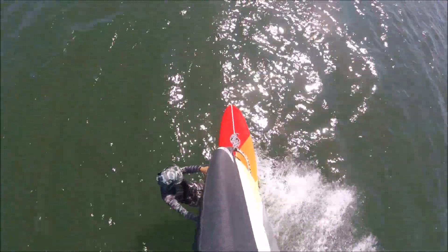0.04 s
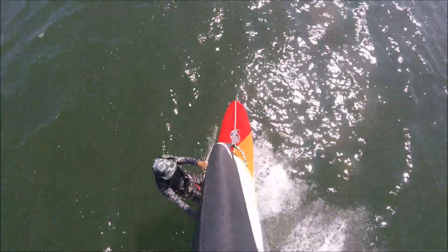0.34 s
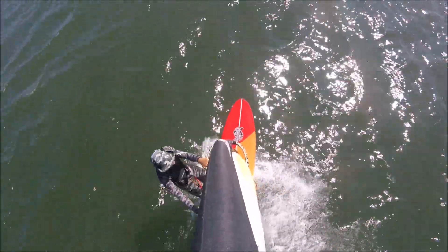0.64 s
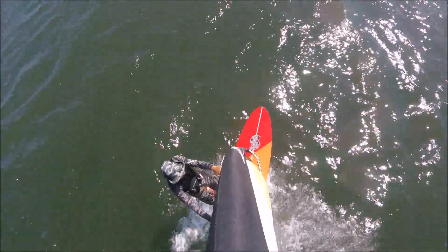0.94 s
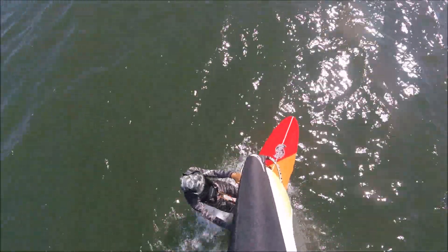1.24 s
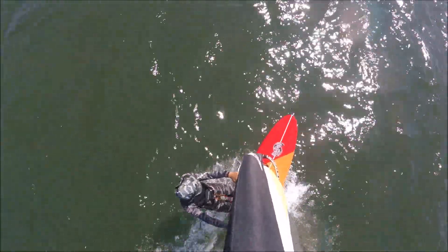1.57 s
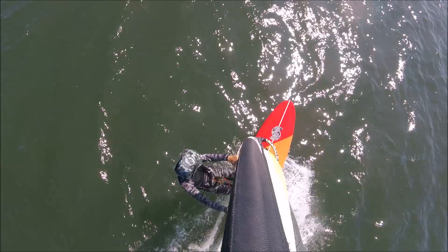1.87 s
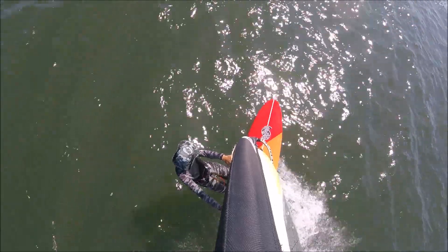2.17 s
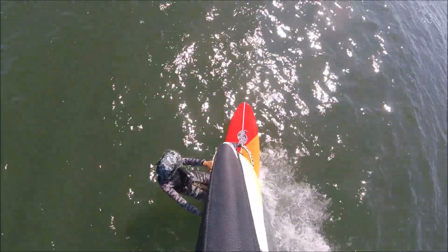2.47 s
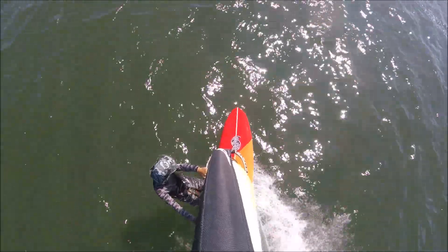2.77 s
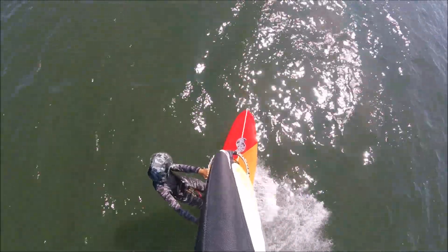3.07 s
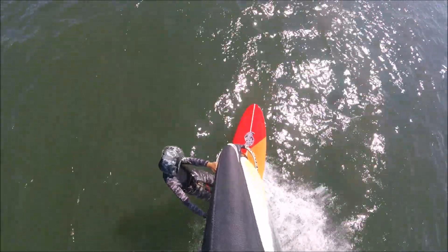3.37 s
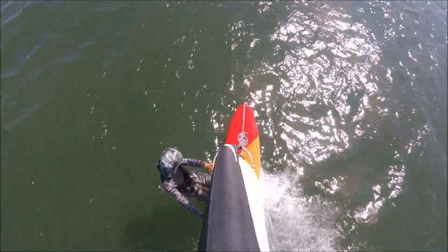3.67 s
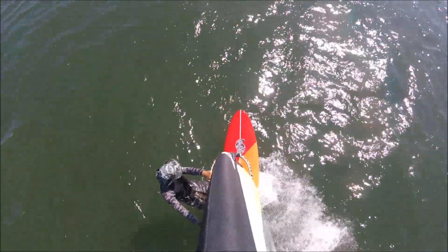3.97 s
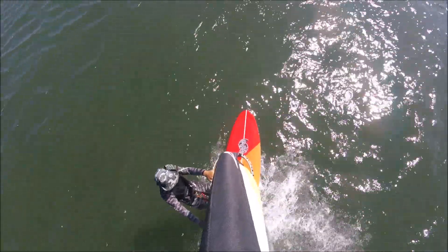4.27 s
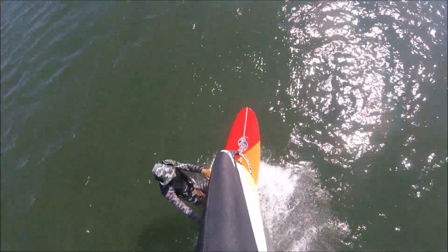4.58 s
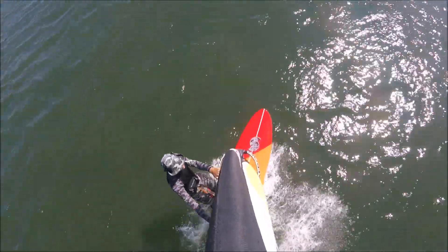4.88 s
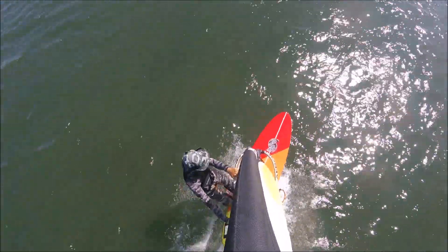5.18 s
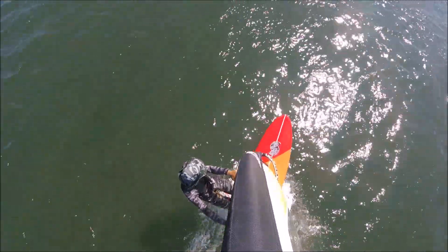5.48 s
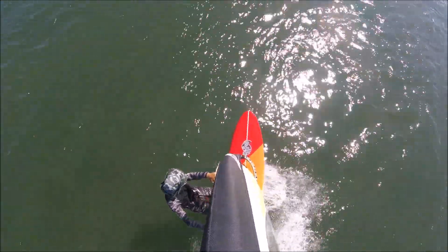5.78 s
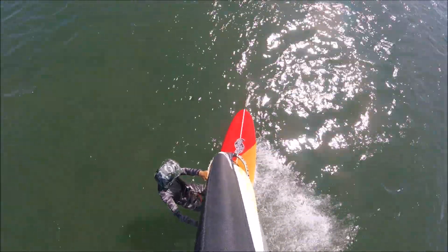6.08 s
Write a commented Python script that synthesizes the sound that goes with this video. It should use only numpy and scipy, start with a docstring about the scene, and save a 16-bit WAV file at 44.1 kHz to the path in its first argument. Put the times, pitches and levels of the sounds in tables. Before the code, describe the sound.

Gusty wind rumbles on the microphone over rushing, gurgling water and the hollow slaps of a fast windsurf board hitting chop.

```python
"""On choppy open water, high on the mast of a planing windsurf board.
Wind buffets the camera's microphone. Below, the hull churns, gushes and slaps the chop, and the sail
throws each slap back. Splashes crackle and ring with trapped air over a hiss of spray. A few drops
tick on the camera; an early one smacks the microphone and ducks the mix. Near the end the rail bites
and a thin sheet of spray sizzles off it."""
import sys
import numpy as np
from scipy import signal
from scipy.fft import rfft, irfft
from scipy.io import wavfile
from scipy.ndimage import uniform_filter1d, minimum_filter1d

SR = 44100
rng = np.random.default_rng(int(sys.argv[2]) if len(sys.argv) > 2 else 0)


def log_audio(samples):
    """Write samples as a 16-bit WAV file to the path given in sys.argv[1]."""
    # one column per channel
    frames = np.atleast_2d(samples).T
    # limit to full scale, then quantise
    limited = np.clip(frames, -1, 1)
    pcm = np.round(limited * 32767).astype(np.int16)
    wavfile.write(sys.argv[1], SR, pcm)


N = 274520
TIME = np.arange(N) / SR


def gain_of(db):
    """Decibels to a gain."""
    return 10 ** (np.asarray(db) / 20)


def unit_rms(x):
    """Scales to rms 1."""
    return x / np.sqrt(np.mean(x ** 2) + 1e-20)


def follow(curve, depth=1):
    """A fader ride along a (time, level) curve; depth scales its decibels."""
    times, db = np.transpose(curve)
    return gain_of(depth * np.interp(TIME, times, db))


def swell(start, hold, rise_s, fall_s):
    """An envelope: linear attack, held until start + hold, exponential release."""
    attack = np.clip((TIME - start) / rise_s, 0, 1)
    return attack * np.exp(-np.maximum(TIME - start - hold, 0) / fall_s)


def equalise(x, curve):
    """Shapes x with an EQ curve, at rms 1."""
    hz, db = np.transpose(curve)
    bins = np.fft.rfftfreq(len(x), 1 / SR)
    response = gain_of(np.interp(np.log(bins + 1), np.log(hz), db))
    return unit_rms(irfft(rfft(x) * response, len(x)))


def add(mix, start, sound):
    """Lays a sound into the mix from a start time in seconds."""
    part = mix[max(round(start * SR), 0):][:len(sound)]
    part += sound[:len(part)]


def drift(rate_hz):
    """A random wobble of rms 1, up to about the given rate."""
    bins = np.fft.rfftfreq(N, 1 / SR)
    return unit_rms(irfft(rfft(rng.standard_normal(N)) / (1 + (bins / rate_hz) ** 4), N))


def jitter(samples, smoothing):
    """A short, quick flutter of rms 1, smoothed over some samples."""
    return unit_rms(uniform_filter1d(rng.standard_normal(samples), size=smoothing))


def patchy_noise(depth_db, width_bins):
    """Noise whose level wanders in small patches of time and frequency."""
    spectra = signal.stft(rng.standard_normal(N), nperseg=256, noverlap=192)[2]
    patches = uniform_filter1d(rng.standard_normal(spectra.shape), size=10, axis=1)
    patches = unit_rms(uniform_filter1d(patches, width_bins, axis=0))
    return signal.istft(spectra * gain_of(depth_db * patches), nperseg=256, noverlap=192)[1][:N]


def froth(envelope, hz, spread):
    """A puff of tiny bubbles: enveloped noise in a band around hz, at rms 1."""
    bins = np.fft.rfftfreq(len(envelope), 1 / SR) + 1
    band = np.exp(-(np.log(bins / hz) / spread) ** 2)
    return unit_rms(irfft(rfft(envelope * rng.standard_normal(len(envelope))) * band))


# Fader ride of the wind on the microphone: (time [s], level [dB])
WIND_RIDE = [(0, -11), (.23, -12), (.3, -13), (1, -12.5), (1.4, -12), (1.72, -13), (1.95, -14), (2.3, -12),
             (2.9, -12.5), (3.95, -10.5), (5.2, -13), (5.65, -9), (6.22, -13)]
# Rumble of the wind: (frequency [Hz], level [dB])
WIND_EQ = [(10, -9), (25, 0.5), (33, -5.5), (42, 2), (52, -2), (65, 1), (85, -4.5), (125, -7.5),
           (170, -14.5), (240, -21), (350, -29.5), (600, -36.5), (1500, -67), (5000, -102)]
# Large slow eddies sitting on the microphone: (start [s], hold [s], level against the wind [dB])
EDDY_CUES = [(0, 0.28, 2.5), (2.725, 0.19, 5)]
# Sub-bass of those eddies: (frequency [Hz], level [dB])
EDDY_EQ = [(15, -14), (28, 3.5), (36, 7), (48, 9.5), (90, -20.5), (2000, -140)]
def wind_buffet():
    """Eddies push on the microphone in quick gusts; the strongest pushes flatten out."""
    eddies = sum(gain_of(db) * swell(start, hold, rise_s=.02, fall_s=.02)
                 for start, hold, db in EDDY_CUES)
    push = equalise(rng.standard_normal(N), WIND_EQ)
    push += eddies * equalise(rng.standard_normal(N), EDDY_EQ)
    power = uniform_filter1d(abs(signal.hilbert(push)) ** 2, size=500) / 2
    gusts = gain_of(np.minimum(drift(rate_hz=12), 1))
    return follow(WIND_RIDE) * gusts * unit_rms(push / np.sqrt(1 + power))


# The rail bites and throws a burst of spray.
RAIL_BITE_S, RAIL_HOLD_S, RAIL_RISE_S = 5.575, .068, .018
# Fader ride of the mist's hiss, swelling and thinning: (time [s], level [dB])
MIST_RIDE = [(0, -43), (.25, -49), (.7, -47.5), (1.05, -45.5), (1.2, -50.5), (1.45, -52), (1.65, -47.5),
             (1.92, -51.5), (2.15, -47), (2.5, -47), (2.78, -43.5), (3.05, -48), (3.42, -43.5), (3.7, -46),
             (4, -43), (4.72, -47), (5.44, -47), (5.51, -48), (5.58, -47.5), (6.22, -45)]
# Hiss of the mist: (frequency [Hz], level [dB])
MIST_EQ = [(1000, -1), (3000, 6), (5000, 0), (6200, -2), (7400, -3.5), (8500, -10.5), (10000, -17),
           (11300, -25), (14400, -24.5), (16000, -43.5)]
def mist():
    """Fine spray hisses smoothly and puffs up as the rail bites."""
    puff = gain_of(-43) * swell(RAIL_BITE_S, RAIL_HOLD_S, RAIL_RISE_S, fall_s=.002)
    hiss = equalise(patchy_noise(depth_db=1.3, width_bins=10), MIST_EQ)
    return np.hypot(follow(MIST_RIDE), puff) * hiss


# Sizzle of the sheet of spray: (frequency [Hz], level [dB])
SHEET_EQ = [(3000, -41), (4300, -21), (5000, -0.5), (5600, -4.5), (6250, -1.5), (6900, -15.5), (8600, -17),
            (10400, -19.5), (11100, -20), (11900, -40), (13200, -29), (15000, -46)]
def spray_sheet(full_db=-43.5, halfway_s=5.72, build_s=.15):
    """A thin sheet of spray builds up off the rail, sizzling higher than the mist."""
    fade_in = gain_of(full_db) / (1 + np.exp((halfway_s - TIME) / build_s))
    return fade_in * equalise(patchy_noise(depth_db=1.5, width_bins=10), SHEET_EQ)


# How hard the hull presses into the water, against steady planing: (time [s], load [dB])
HULL_LOAD = [(0, -4), (.28, -0.5), (.36, -8.5), (.56, -1), (1, -5.5), (1.15, -1), (1.72, 0.5), (1.95, -5),
             (2.25, 1), (2.9, -0.5), (3.3, 1.8), (3.8, 1), (4.12, -1), (4.45, -3.5), (4.8, -1),
             (5.28, -3.5), (5.46, -2.5), (5.52, -6), (5.6, 0), (6.22, -1.5)]
# Midrange patter of landing water: (frequency [Hz], level [dB])
SPLATTER_EQ = [(300, -16), (800, -12), (1250, 0), (1650, 0), (2100, -5), (3000, -13.5), (4200, -25.5),
               (7000, -27), (14000, -63)]
def splatter(drops_per_s=1500):
    """Thrown water lands as a wash and countless drops: more under load, ragged as the rail bites."""
    sizes = gain_of(4 * np.minimum(rng.exponential(1, N), 4)) * rng.choice([-1, 1], N)
    drops = unit_rms(sizes * (rng.random(N) < drops_per_s / SR))
    wash = unit_rms(patchy_noise(depth_db=3, width_bins=5))
    thrown = gain_of(-36.5) * follow(HULL_LOAD, depth=.71)
    ragged = gain_of(-51 + 3 * drift(rate_hz=60))
    burst = ragged * swell(RAIL_BITE_S, RAIL_HOLD_S, RAIL_RISE_S, fall_s=.12)
    return np.hypot(thrown, burst) * equalise(wash + .51 * drops, SPLATTER_EQ)


# The hull cuts through a wave: (start [s], hold [s], froth level [dB], deep water level [dB])
WAVE_CUES = [(0.26, 0.016, -27, -32), (0.517, 0.13, -35, -26.5), (0.799, 0.07, -32, -26),
             (1.114, 0.065, -31.5, -15), (1.306, 0.18, -36, -27), (1.525, 0.069, -30, -18),
             (1.666, 0.062, -23, -16.5), (1.977, 0.15, -28.5, -38), (2.242, 0.072, -28.5, -16.5),
             (2.55, 0.64, -31.5, -31), (3.193, 0.1, -28, -32), (3.48, 0.25, -35, -38),
             (3.891, 0.067, -26.5, -19.5), (4.04, 0.15, -27, -21.5), (4.76, 0.11, -33, -38),
             (5.37, 0.11, -36, -18.5), (5.76, 0.26, -27, -24), (6.098, 0.066, -30, -18.5)]
FROTH, DEEP_WATER = 0, 1
def surges(layer):
    """The envelope of the froth or deep water shoved aside by one wave after another."""
    return sum(gain_of(levels[layer]) * swell(start, hold, rise_s=.018, fall_s=.002)
               for start, hold, *levels in WAVE_CUES)


# Low body of the churning water: (frequency [Hz], level [dB])
CHURN_EQ = [(70, -18), (170, 3.5), (270, 0.5), (420, -3), (650, -13.5), (1100, -31.5), (4000, -74)]
def churn(throb_db=4.5):
    """The hull ploughs along: a lumpy low wash that grows with the load and heaves at each wave."""
    water = patchy_noise(depth_db=2, width_bins=3)
    throb = gain_of(throb_db * np.minimum(drift(rate_hz=33), .5))
    planing = gain_of(-24) * follow(HULL_LOAD, depth=.6)
    heave = gain_of(-1) * surges(DEEP_WATER)
    return np.hypot(planing, heave) * equalise(water * throb, CHURN_EQ)


def air_pocket(hz, length_s, froth_share, glide, rise_s=.0013):
    """Trapped air rings with a falling, unsteady pitch among smaller bubbles, peaking mid-buffer."""
    t = np.arange(-4096, 4096) / SR
    age = np.maximum(t + .35 * length_s, 0)
    envelope = (1 - np.exp(-(age / rise_s) ** 2)) * np.exp(-(age / length_s) ** 2)
    pitch = hz * np.exp(-glide * np.tanh(t / length_s) + .1795 * jitter(len(t), smoothing=80))
    ring = envelope * np.sin(2 * np.pi * (np.cumsum(pitch) / SR + rng.random()))
    return unit_rms(unit_rms(ring) + froth_share * froth(envelope, hz, spread=.13))


def gurgle(per_s=130, low_hz=550, high_hz=1402, sizes=16):
    """Small air pockets of many sizes burst at random."""
    out = np.zeros(N)
    for hz in np.geomspace(low_hz, high_hz, sizes):
        triggers = rng.uniform(.99, 1, N) * (rng.random(N) < per_s / sizes / SR)
        pocket = air_pocket(hz, length_s=.0115, froth_share=.89, glide=.086)
        out += signal.oaconvolve(triggers, pocket, "same")
    return unit_rms(out)


# Throaty rush of aerated water: (frequency [Hz], level [dB])
GUSH_EQ = [(200, -8.5), (450, 2), (750, 6.5), (1100, 3.5), (1450, -5.5), (2000, -24), (4000, -31),
           (9000, -68)]
def gush():
    """Aerated water rushes from under the hull, gurgling with bubbles and surging at each wave."""
    water = equalise(patchy_noise(depth_db=4, width_bins=3), GUSH_EQ)
    bubbles = gain_of(-7) * gurgle()
    planing = gain_of(-33) * follow(HULL_LOAD, depth=2.06)
    return np.hypot(planing, surges(FROTH)) * unit_rms(water + bubbles)


# Drops hitting the camera: (time [s], peak [dB], brightness tilt [dB/octave])
TICK_CUES = [(0.102, -8, 1), (1.6555, -15, -2), (1.6975, -18, -3), (1.7124, -8.5, 0), (1.7251, -7, -2.5),
             (1.7277, -16.5, 5), (1.7747, -17, 1)]
# Snap of one drop: (frequency [Hz], level [dB])
TICK_EQ = [(300, -23), (1000, 4.5), (2000, 11), (3500, 0), (6500, -8.5), (9000, -23), (12000, -45),
           (16000, -47)]
def camera_ticks(spatter_share=.14, spatter_s=.0007):
    """Each drop on the camera is a dry snap and a trace of spatter, with its own brightness."""
    t = np.arange(-256, 768) / SR
    out = np.zeros(N)
    for time, db, tilt in TICK_CUES:
        impulse = t == 0
        spatter = spatter_share * rng.standard_normal(len(t)) * (t > 0) * np.exp(-abs(t) / spatter_s)
        snap = equalise(impulse + spatter, [(hz, level + tilt * np.log2(hz)) for hz, level in TICK_EQ])
        add(out, time + t[0], gain_of(db) * snap / abs(snap).max())
    return out


# One large drop: (time [s], envelope peak [dB], pitch [Hz], decay [s])
SMACK_CUE = (.1017, 10.5, 810, .00078)
def microphone_smack():
    """A large drop lands on the microphone port: a hard knock that dies in about two cycles."""
    time, db, hz, decay = SMACK_CUE
    age = np.maximum(TIME - time, 0)
    envelope = (age / decay) ** 2 * np.exp(2 - 2 * age / decay)
    return gain_of(db) * envelope * np.sin(2 * np.pi * hz * age)


# Sloshes of water falling back: (time [s], level [dB], pitch [Hz], length [s])
SPLASH_CUES = [(0.28, -23.5, 784, 0.0086), (0.301, -28, 1340, 0.016), (0.422, -27, 1403, 0.021),
               (0.542, -24.5, 1300, 0.011), (0.598, -29.5, 1150, 0.031), (0.776, -24.5, 1330, 0.012),
               (1.105, -25, 1385, 0.016), (1.254, -19.5, 1600, 0.0044), (1.347, -26.5, 1290, 0.0303),
               (1.427, -29, 1196, 0.027), (1.73, -17, 993, 0.0073), (1.87, -26, 1580, 0.0102),
               (2.293, -26, 837, 0.029), (2.333, -23, 720, 0.017), (2.702, -23.5, 850, 0.027),
               (2.719, -26, 1544, 0.015), (2.756, -21, 750, 0.019), (2.574, -23, 1400, 0.0042),
               (2.815, -21, 1580, .005), (2.868, -28, 782, 0.033), (3.992, -15, 1460, .0045),
               (4.165, -21.5, 1150, 0.0096), (4.197, -14, 1400, 0.0031), (4.365, -24, 1956, 0.0056),
               (4.472, -20, 1230, 0.0061), (4.679, -24, 1360, 0.015), (4.77, -25, 1280, 0.01),
               (5.56, -29.5, 1960, 0.012), (5.594, -30.5, 2230, 0.03), (5.647, -32.5, 2000, 0.022),
               (5.652, -20, 700, 0.014), (5.727, -25, 1694, .018), (5.78, -27, 1900, 0.016),
               (5.795, -18, 1140, .014), (6.026, -31.5, 1880, 0.036)]
def splashes(trim_db=1, crackle_db=4, rise_s=.0013):
    """A slosh lands as a crackling clump of drops with an air pocket ringing in it."""
    t = np.arange(-4096, 4096) / SR
    out = np.zeros(N)
    for time, db, hz, length in SPLASH_CUES:
        age = np.maximum(t + .5 * length, 0)
        envelope = (1 - np.exp(-age / rise_s)) * np.exp(-(age / (.72 * length)) ** 2)
        crackle = gain_of(crackle_db * np.minimum(jitter(len(t), smoothing=60), 2))
        drops = froth(envelope * crackle, hz, spread=.55)
        pocket = air_pocket(hz, length, froth_share=.64, glide=.1)
        level = gain_of(trim_db + db) * np.sqrt(np.mean(envelope ** 2))
        add(out, time + t[0], level * unit_rms(drops + 1.4 * pocket))
    return out


def hull_knock(hz):
    """Water meets the flat hull: a hollow, wet-edged knock that peaks after one cycle."""
    cycles = np.arange(2048) / SR * hz
    envelope = (cycles * np.exp(1 - cycles)) ** 4
    wet_edge = gain_of(-21) * froth(np.ones_like(envelope), hz=1150, spread=.27)
    return envelope * (np.cos(2 * np.pi * cycles) + wet_edge)


def with_sail_echo(x, echo_db, delay_s=.0055):
    """A sound arrives twice: straight up, then off the sail."""
    late = np.concatenate([np.zeros(round(delay_s * SR)), x])[:len(x)]
    return x + gain_of(echo_db) * late


def ripples(per_s=16, low_hz=430, high_hz=850, sizes=8):
    """Small ripples pat the hull at random, louder under load."""
    pats = np.zeros(N)
    for hz in np.geomspace(low_hz, high_hz, sizes):
        triggers = rng.uniform(.31, 1, N) * (rng.random(N) < per_s / sizes / SR)
        pats += signal.oaconvolve(triggers, hull_knock(hz))[:N]
    return gain_of(-39) * follow(HULL_LOAD, depth=.67) * unit_rms(with_sail_echo(pats, echo_db=-8))


# The hull hitting the chop: (time [s], direct peak [dB], pitch [Hz], echo against direct [dB])
SLAP_CUES = [(.0855, -13, 610, -18), (.1068, -11, 477, 8), (.2715, -14, 680, -4), (.2845, -17, 700, -13),
             (.529, -18, 600, 1), (.5448, -5, 630, -5), (.6814, -8.5, 497, 0), (.8389, -5.5, 625, -20),
             (0.875, -9.5, 504, 3), (1.0661, -11, 530, 0.5), (1.1486, -15, 490, 6), (1.1697, -6.5, 605, -5),
             (1.2, -14, 520, -2), (1.3851, -21.5, 600, 6), (1.4738, -10.5, 1045, -11), (1.572, -19, 773, 5),
             (1.6823, -13.5, 900, -5), (1.6993, -10, 393, -11), (1.7137, -12.5, 480, 0),
             (1.7374, -3.5, 335, -24), (2.0867, -8.5, 1110, -11), (2.1347, -12.5, 447, 3),
             (2.3173, -15, 710, 2), (2.5727, -9, 860, -4), (2.586, -12, 644, -18), (2.6723, -14, 557, 1),
             (2.801, -18, 760, -7), (2.8125, -14.5, 668, -3), (2.911, -12.5, 675, 4.5),
             (2.9961, -8.5, 580, -3), (3.133, -16, 640, -3), (3.3057, -14.5, 550, 4.5),
             (3.6112, -8, 544, -2), (3.6245, -9.5, 650, -7), (3.734, -16.5, 620, -10), (3.95, -13, 477, -3),
             (4.0722, -6, 504, -0.5), (4.165, -14.5, 517, -8), (4.1998, -4, 715, -18),
             (4.4707, -8, 1050, -9), (4.518, -16, 430, -9), (4.6452, -6, 523, 0.5), (4.801, -18, 577, 4),
             (4.92, -18, 450, -1), (5.1015, -11.5, 436, -1.5), (5.413, -16, 364, -8),
             (5.4432, -10, 380, -3), (5.485, -9, 494, 6), (5.5453, -10.5, 950, -10),
             (5.884, -14.5, 714, -6), (5.904, -15, 680, -10), (6.1441, -18, 506, -4)]
def hull_slaps():
    """The hull slaps wave after wave, and the sail throws each knock back."""
    out = np.zeros(N)
    for time, db, hz, echo_db in SLAP_CUES:
        start = time - 1 / hz  # one cycle early, so the peak lands on the cue
        add(out, start, gain_of(db) * with_sail_echo(hull_knock(hz), echo_db))
    return out


def scene():
    """The mono mix: a bed of wind, wash and spray under the hits of water."""
    bed = wind_buffet() + churn() + gush() + splatter() + mist() + spray_sheet()
    hits = hull_slaps() + ripples() + microphone_smack() + splashes() + camera_ticks()
    return (bed + hits)[None]


def record(dry, ceiling_db=-.4, split_hz=220, bass_db_per_s=700, upper_db_per_s=90, top_hz=15200):
    """A limiter ducks the mix at the hardest hit and lets the bass back first; a low-pass follows."""
    over_db = np.maximum(20 * np.log10(abs(dry[0]) + 1e-9) - ceiling_db, 0)
    bass = signal.sosfiltfilt(signal.butter(2, split_hz, fs=SR, output="sos"), dry)
    out = np.zeros_like(dry)
    for band, release in (bass, bass_db_per_s), (dry - bass, upper_db_per_s):
        duck_db = np.maximum.accumulate(over_db + TIME * release) - TIME * release
        ahead_db = -minimum_filter1d(-duck_db, size=61)  # look-ahead, so the gain glides down
        out += band / gain_of(uniform_filter1d(ahead_db, size=61))
    lowpass = signal.firwin(511, top_hz, window=("kaiser", 9), fs=SR)
    edge_fades = np.minimum(np.minimum(TIME, TIME[-1] - TIME) / .003, 1)
    return signal.oaconvolve(edge_fades * out, lowpass[None], "same")


dry = scene()
out = record(dry)
log_audio(out)
```